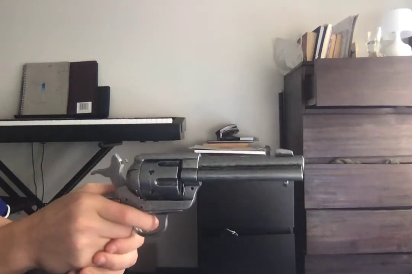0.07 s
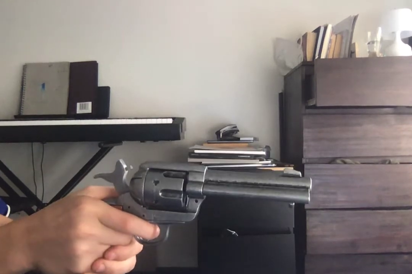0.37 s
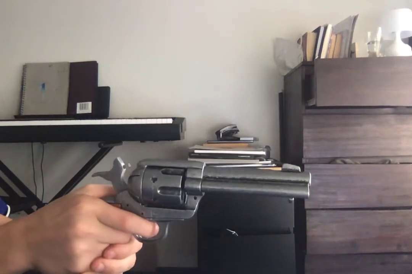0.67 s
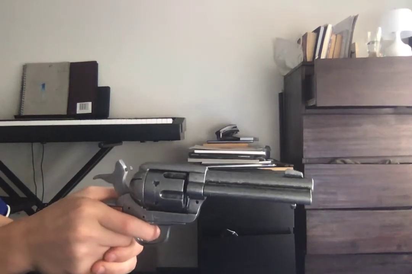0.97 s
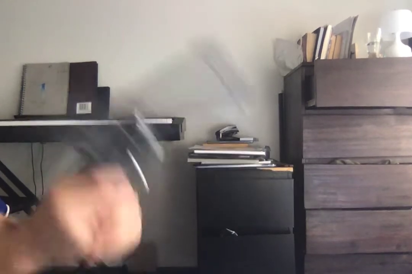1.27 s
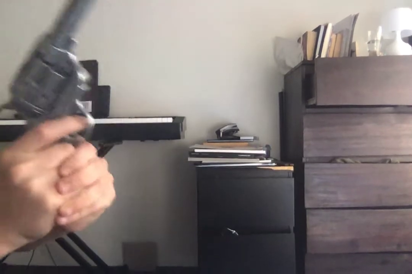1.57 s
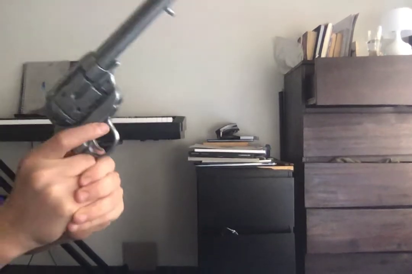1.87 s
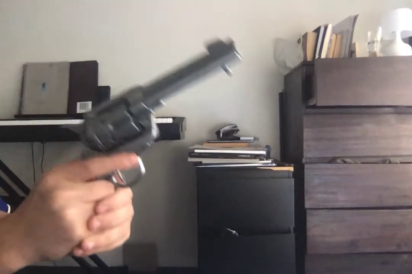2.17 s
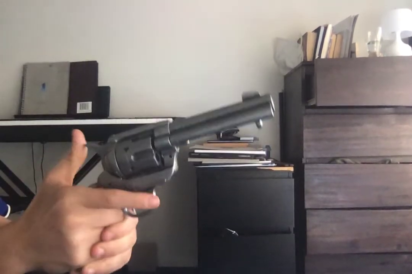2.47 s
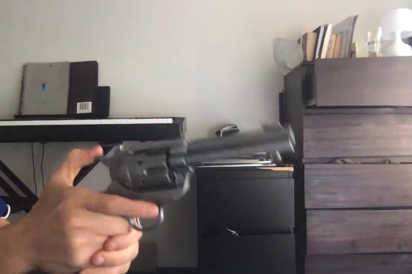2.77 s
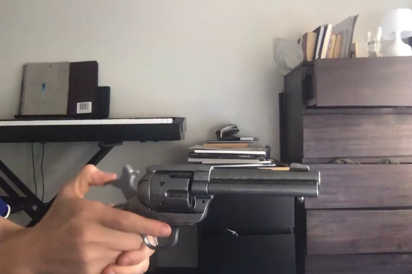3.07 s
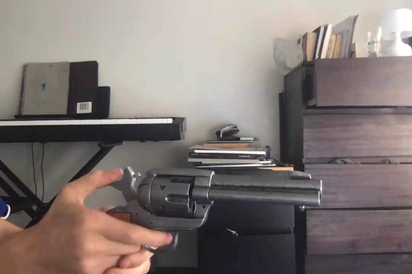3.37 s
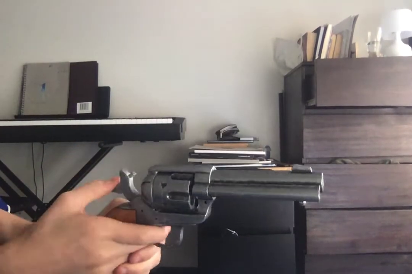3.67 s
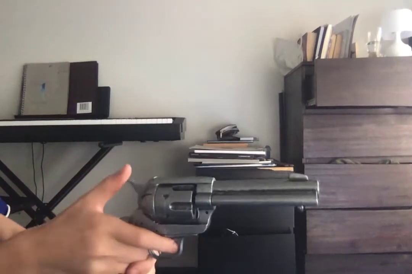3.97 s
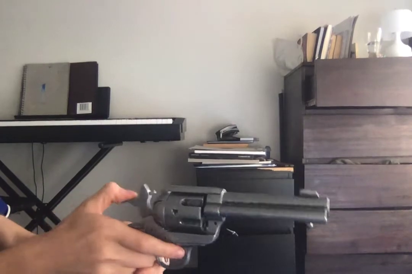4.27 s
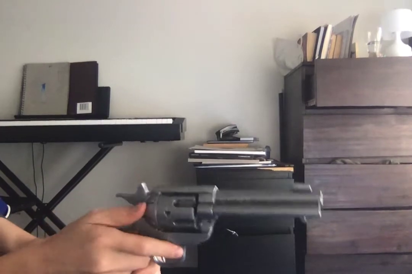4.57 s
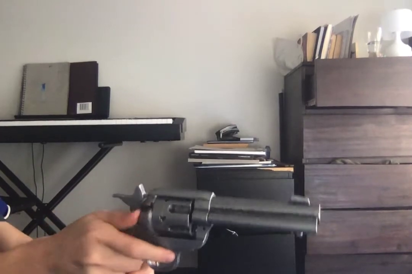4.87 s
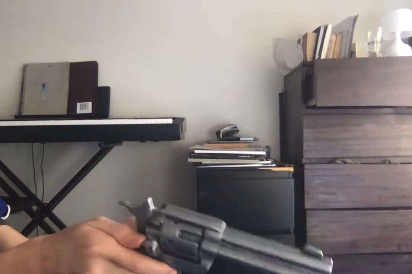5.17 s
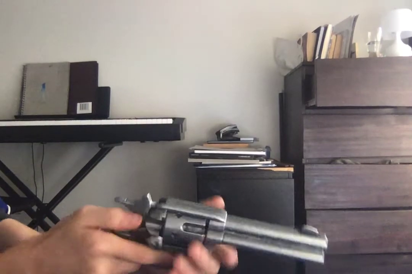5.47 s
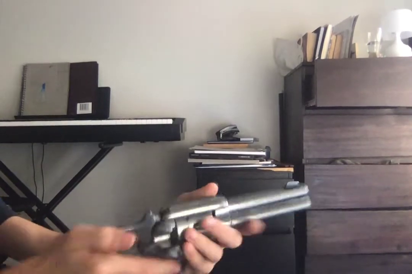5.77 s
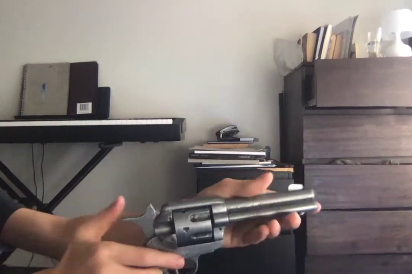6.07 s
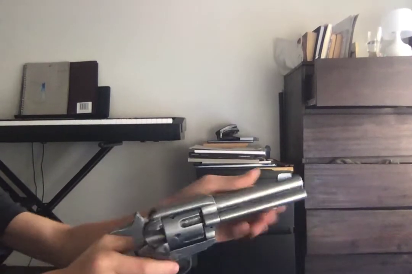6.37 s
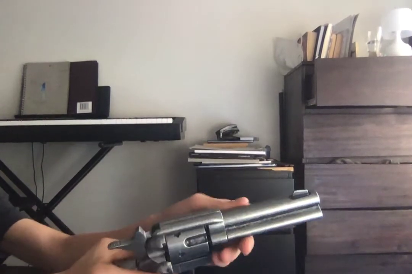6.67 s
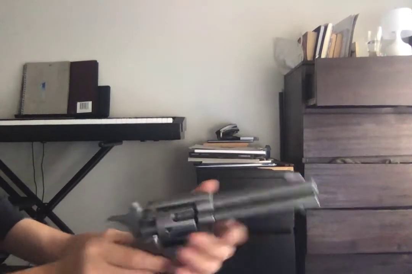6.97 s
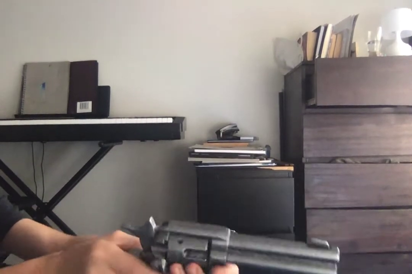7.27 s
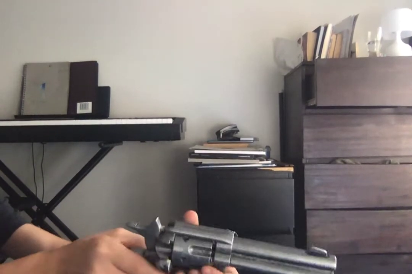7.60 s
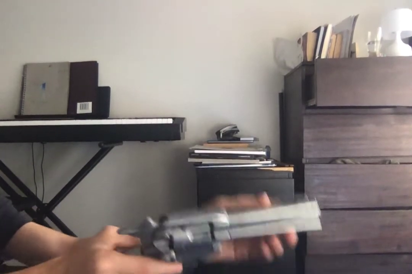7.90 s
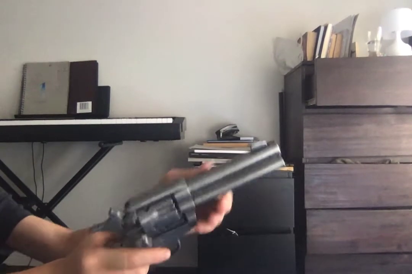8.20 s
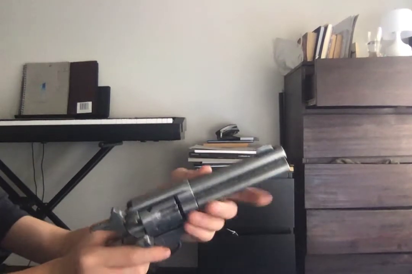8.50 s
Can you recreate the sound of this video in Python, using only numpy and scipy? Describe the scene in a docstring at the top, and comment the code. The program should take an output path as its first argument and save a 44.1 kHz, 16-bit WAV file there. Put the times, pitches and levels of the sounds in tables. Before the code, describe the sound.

In a small room with a quiet rumble, a replica revolver fires a single cap. The sharp crack overloads the close microphone and leaves the furniture briefly ringing. The hammer is then thumbed back with light ratchet clicks and spring pings. A faint whoosh and whine swell and fade far away, while the loose cylinder slides and clinks brightly and handling bumps come through as low thumps.

```python
"""A small room with a quiet rumble, one mono microphone close to a replica revolver.
Just over a second in, the hammer drops and one cap fires: the crack overloads the input for a fifth of
a second and sets the furniture ringing. The hammer is thumbed back in ratchet clicks and spring pings.
A faint whoosh and whine swell far off and fade, while close up the loose cylinder slides and clinks in
the frame and handling bumps reach the microphone as low thumps."""
import sys
import numpy as np
from scipy import signal
from scipy.fft import rfft, irfft, next_fast_len
from scipy.io import wavfile

SR = 44100
rng = np.random.default_rng(int(sys.argv[2]) if len(sys.argv) > 2 else 0)


def generate_wav(signal):
    """Clip the signal to [-1, 1] and save it as 16-bit WAV at the path in sys.argv[1]."""
    frames = np.transpose(np.atleast_2d(signal))
    scaled = np.clip(frames, -1, 1) * 32767
    pcm = np.round(scaled).astype(np.int16)
    wavfile.write(sys.argv[1], SR, pcm)


N = 385434
TIME = np.arange(N) / SR

# Rumble and hiss of the room. Each row: frequency in Hz, relative level in dB per Hz.
ROOM_TONE = [(15, -36), (25, -11.5), (53, 2.5), (76, -7.5), (114, -0.5), (141, -18), (175, -10.5),
             (195, -24.5), (223, -17), (317, -21.5), (659, -26.5), (796, -30.5), (2690, -34.7),
             (14000, -46.8), (16000, -49)]
# Resonances of the distant whoosh. Each row: frequency in Hz, width in Hz, gain in dB.
WHOOSH_PEAKS = [(579, 17, -3.5), (700, 58, 2), (846, 60, -1), (1016, 70, -2.5)]
# Decay of the room. Each row: frequency in Hz, t60 in seconds before linger scales it.
ROOM_T60 = [(100, 0.38), (400, 0.57), (1000, 0.5325), (2000, .5), (4000, 0.4878), (7000, 0.4218),
            (10000, 0.3254), (15000, 0.0038)]
# Colour of the echoes as heard, with the top treble dulled. Each row: frequency in Hz, gain in dB.
ROOM_COLOUR = [(100, -4), (400, -8.5), (1000, 0.5), (2000, 3.5), (4000, -2), (7000, -4.5), (10000, -1),
               (15000, -7)]
# Furniture and fittings rung by the shot. Each row: frequency in Hz, level in dB, t60 in seconds.
FITTING_MODES = [(630, -26, .7), (976, -11, .61), (1056, -12.5, .61), (1396, -10, .55), (2067, -5, .56),
                 (2555, -9, .5)]
# Bumps and puffs of air at the microphone.
# Each row: start in seconds, peak level in dB, resting pitch in Hz, swell time in seconds.
THUMPS = [(1.267, 9, 170, .006), (1.287, 13, 55, .0075), (5.919, -48, 85, .03), (6.595, -41, 380, .004),
          (6.602, -21, 75, .006), (6.628, -25.5, 70, .008), (6.67, -40, 130, .015),
          (6.729, -22.5, 42, .007), (8.33, -21.5, 56, .0086), (8.3597, 6.5, 33, .008),
          (8.421, -39, 70, .052)]
# Metal sliding on metal. Each row: start in seconds, end in seconds, level in dB.
SLIDES = [(1.247, 1.255, -48), (1.255, 1.262, -13.5), (2.738, 2.748, -58), (2.894, 2.902, -47),
          (2.96, 2.966, -39), (3.869, 3.876, -57), (4.27, 4.282, -62), (5.691, 5.728, -70),
          (6.302, 6.317, -54), (6.411, 6.42, -36), (6.666, 6.719, -35.3), (7.316, 7.38, -60),
          (8.03, 8.1, -56), (8.142, 8.216, -45.5), (8.311, 8.35, -40.5), (8.339, 8.363, -30.5)]
# Resonances of the rubbed frame. Each row: frequency in Hz, width in Hz, gain in dB.
FRAME_PEAKS = [(1470, 250, -4), (2170, 220, -1.5), (3100, 91, -3), (4350, 250, -0.5), (6280, 300, -0.5),
               (7110, 250, -5), (7620, 900, -0.5), (9380, 180, -6), (11500, 140, -4.5)]
# Contacts of hammer, pawl and cylinder. Each row: start in seconds, level in dB, brightness in dB,
# pitch of the frame in Hz, contact time in seconds, rebound share from 0 to 1.
CLICKS = [(2.727, -50, -22, 2420, .0016, 0), (2.777, -49.5, -11, 2600, .0012, 0),
          (2.9028, -33, -5, 2450, .0014, 0), (2.9571, -51, 1, 2600, .0018, .8),
          (3.098, -53, -7, 2610, .001, 0), (3.104, -42, 3, 2450, .0007, .85),
          (3.56, -62, -5, 2330, .0008, 0), (3.8217, -39.5, -8, 2050, .0009, 0),
          (3.898, -53.5, 3, 2310, .0006, 0), (4.145, -44, -23, 2400, .0011, 0),
          (4.256, -62, 0, 2630, .0008, 0), (4.2912, -34.5, 1, 2500, .0016, 0),
          (4.393, -40, -9, 2200, .0009, .4), (4.9475, -41.5, -7, 2100, .0009, .8),
          (5.1727, -63, -13, 2200, .001, 0), (5.4065, -63, -28, 2200, .0014, 0),
          (5.6902, -62, -18, 2490, .0008, 0), (5.918, -49, 4, 2500, .0007, 0),
          (6.3307, -52, 4, 2750, .0007, 0), (6.3878, -44.5, 14, 2700, .0021, .3),
          (6.7252, -32, 10.5, 2350, .0015, .5), (7.334, -58, -10, 2050, .001, 0),
          (7.369, -57.5, 2.5, 2270, .0007, 0), (7.4125, -59, -16, 1950, .0012, 0),
          (7.9147, -69, -5, 2200, .0012, 0), (8.0581, -53, 4, 2200, .0021, 0),
          (8.1221, -54, 7, 1950, .0008, 0), (8.138, -49, -3, 2020, .0008, 0),
          (8.213, -55, -1, 1850, .0014, 0), (8.307, -52, 10, 1910, .001, 0),
          (8.361, -30, 14, 2050, .001, .4)]
# Resonances of the struck, hollow frame. Each row: multiple of its pitch, gain in dB.
HOLLOW_PEAKS = [(.45, -15), (.7, -8), (1, 0), (1.45, -11)]
# The grip knocks more once the cocking is over. Each row: time in seconds, dB against the frame.
GRIP_KNOCK = [(4.4, -27), (4.95, -12)]
# Blows that ring the cylinder. Each row: start in seconds, level in dB.
CLINKS = [(5.918, -36), (6.703, -33), (6.7256, -2.5), (8.0594, -41), (8.3612, -3.5), (8.3715, -8)]
# Modes of the cylinder. Each row: frequency in Hz, relative level in dB, t60 in seconds.
CYLINDER_MODES = [(2170, -28, 0.043), (2965, -32.5, .06), (4269, -17, .11), (4958, -19, 0.082),
                  (6200, -23, 0.058), (7090, -16.5, .07), (7620, -5.5, 0.062), (8070, -6.5, 0.062),
                  (8283, -2.5, .035), (8680, -9, .035), (9380, -17.5, 0.055), (10930, -12, .09),
                  (11070, -13.5, .06), (11420, -4.5, .09), (12600, -25, .08), (14450, -13, .045),
                  (15250, -14, .07)]
# Short high metal pings. Each row: start in seconds, level in dB, pitch in Hz, t60 in seconds.
PINGS = [(2.9035, -15.5, 3800, .012), (2.9565, -26, 7360, .26), (3.105, -26, 3850, .016),
         (4.2925, -26.5, 7440, .14), (5.918, -33, 4290, .06), (5.918, -32, 6175, .05),
         (6.389, -25, 6260, .05), (7.369, -42, 4800, .025)]
# Modes of a ping. Each row: multiple of its pitch, relative level in dB.
PING_MODES = [(0.998, -6), (1.01, -2), (1.485, -18)]
# The hammer lands on the cap. One row: start in seconds, level in dB, contact time in seconds.
HAMMER_FALL = (1.2553, 0, 0.0013)
# The charge goes off. One row: start in seconds, base level in dB, burn time in seconds.
CHARGE = (1.2642, 18.56, 0.0065)
# Spectrum of the crack. Each row: frequency in Hz, relative level in dB per Hz.
SHOT_COLOUR = [(30, -14.5), (100, -8), (250, -6), (500, -9.5), (1000, -2.5), (2000, 0.5), (4000, 2),
               (7000, 2.5), (10000, -2.5), (15000, -5)]


def from_db(db):
    """Decibels to gain."""
    return 10 ** (np.asarray(db) / 20)


def rms_one(x):
    """Scale to an rms of 1."""
    return x / np.sqrt(np.mean(x ** 2) + 1e-20)


def at_hz(points, hz):
    """Read a table on a log-frequency axis."""
    known_hz, values = np.transpose(points)
    return np.interp(np.log(np.maximum(hz, 1)), np.log(known_hz), values)


def add(track, s, sound):
    """Mix a sound into a track at s seconds."""
    i = max(round(s * SR), 0)
    track[i:i + len(sound)] += sound[:N - i]


def band(x, low_hz, high_hz, order=2):
    """Butterworth band-pass."""
    sections = signal.butter(order, [low_hz, min(high_hz, .48 * SR)], "band", fs=SR, output="sos")
    return signal.sosfilt(sections, x + 1e-18)


def resonate(x, peaks):
    """Parallel resonances of alternating sign."""
    return sum((-1) ** k * from_db(db) * signal.lfilter(*signal.iirpeak(hz, hz / width, fs=SR), x)
               for k, (hz, width, db) in enumerate(peaks))


def noise(colour, size):
    """Noise of a given spectrum, rms 1."""
    n = next_fast_len(size)
    gain = from_db(at_hz(colour, np.arange(n // 2 + 1) * SR / n))
    return rms_one(irfft(rfft(rng.standard_normal(n)) * gain, n)[:size])


def swell(t, peak_s):
    """Rises to 1 at peak_s, then dies away."""
    return t / peak_s * np.exp(1 - t / peak_s)


def ring(hz, db, t60):
    """One struck mode."""
    t = TIME[:SR]
    return from_db(db - 60 * t / t60) * np.sin(2 * np.pi * hz * t)


def room_tone(level_db=-56.5):
    """The steady rumble and hiss of the room."""
    return from_db(level_db) * noise(ROOM_TONE, N)


def distant_whoosh(start_s=4.3, attack_s=.2, level_db=-58.3, fade_db_per_s=7.7, whine_db=-9,
                   start_hz=450, end_hz=945, climb_s=1.02, flare_hz=733, width_hz=32, flare_db=16.5):
    """Far off, a hollow whoosh swells and fades; its whine climbs and flares up through a resonance."""
    age = np.maximum(TIME - start_s, 0)
    attack = np.minimum(age / attack_s, 1) ** 2
    fade = from_db(level_db - fade_db_per_s * np.maximum(age - attack_s, 0))
    whoosh = rms_one(band(resonate(rng.standard_normal(N), WHOOSH_PEAKS), 480, 1800))
    hz = end_hz + (start_hz - end_hz) * np.exp(-age / climb_s)
    waver = rms_one(band(rng.standard_normal(N), .7, 18))
    whine = rms_one(waver * np.sin(2 * np.pi * np.cumsum(hz) / SR))
    flare = 1 + from_db(flare_db) / (1 + (2 * (hz - flare_hz) / width_hz) ** 2)
    return attack * fade * (whoosh + from_db(whine_db) * flare * whine)


def room_echoes(x, linger, first_echo_s=.0027, build_s=.003):
    """Diffuse echoes follow a short gap and die faster in the treble; linger scales their decay time."""
    t, echoes = TIME[:SR], np.zeros(SR)
    late = np.maximum(t - first_echo_s, 0)
    white = rng.standard_normal((2, SR))
    edges_hz = np.geomspace(40, 19000, 19)
    for k, (low, high) in enumerate(zip(edges_hz, edges_hz[1:])):
        hz = np.sqrt(low * high)
        t60 = linger * at_hz(ROOM_T60, hz)
        unit_energy = np.sqrt(2 * np.log(1000) / (t60 * SR))
        decay = from_db(at_hz(ROOM_COLOUR, hz) - 60 * late / t60)
        echoes += band(white[k % 2], low, high) * unit_energy * decay
    return signal.fftconvolve(x, echoes * (1 - np.exp(-late / build_s)))[:N]


def microphone_thumps(shudder_hz=296, sink_s=.004, doubling_db=15):
    """A bump at the microphone starts as a shudder, quicker if harder, and slows to a deep wobble."""
    out, t = np.zeros(N), TIME[:SR // 2]
    for s, db, rest_hz, swell_s in THUMPS:
        hz = rest_hz + shudder_hz * 2 ** (db / doubling_db) * np.exp(-t / sink_s)
        add(out, s, from_db(db) * swell(t, swell_s) * np.sin(2 * np.pi * np.cumsum(hz) / SR))
    return out


def metal_slides(slips_per_s=750, spread_db=4.5, rasp_db=-12):
    """Small uneven slips rasp and ring the frame, each with its own mix of resonances."""
    out = np.zeros(N)
    for start, end, db in SLIDES:
        n = max(round((end - start) * SR), SR // 200)
        pressure = np.pad(signal.windows.tukey(n, .5), (0, SR // 100))
        slips = (rng.random(len(pressure)) < slips_per_s / SR) * pressure
        slips[n // 2] = 1   # every slide catches at least once
        slips *= from_db(spread_db * rng.standard_normal(len(slips)))
        metal = sum(resonate(slips * rng.standard_normal(len(slips)), [peak]) for peak in FRAME_PEAKS)
        rasp = band(rng.standard_normal(len(slips)) * pressure, 1900, 10000)
        sound = band(rms_one(metal) + from_db(rasp_db) * rms_one(rasp), 1100, 17000)
        top_hz = np.clip(9000 * from_db(db + 42.5), 4000, 16000)   # a light touch is duller
        sound = band(sound, 500, top_hz, order=1)
        add(out, start, from_db(db) * rms_one(sound) * np.sqrt(len(sound) / n))
    return out


def ratchet_clicks(grip_hz=580, grip_width_hz=270, firm_db=-44, middle_db=2, rebound_s=.01):
    """Metal contacts chatter: a knock in the grip, the hollow frame, a hard middle, a bright edge."""
    out, t = np.zeros(N), TIME[:SR // 25]
    for s, db, bright_db, frame_hz, contact_s, rebound in CLICKS:
        width_hz = 500 * from_db(.2 * bright_db)   # a brighter, harder contact damps the frame
        peaks = [(frame_hz * multiple, width_hz, peak_db) for multiple, peak_db in HOLLOW_PEAKS]
        knock_db = np.interp(s, *np.transpose(GRIP_KNOCK)) + .4 * (db - firm_db)   # firmer knocks more
        for delay_s, share in ((0, 1), (rebound_s, rebound)):   # some parts bounce once
            force = rng.standard_normal((4, len(t))) * swell(t, contact_s)
            grip = rms_one(band(resonate(force[0], [(grip_hz, grip_width_hz, 0)]), 350, 1700))
            frame = rms_one(band(resonate(force[1], peaks), 900, 4200))
            middle = from_db(middle_db + .55 * bright_db) * rms_one(band(force[2], 3250, 6400, order=3))
            edge = from_db(bright_db) * rms_one(band(force[3], 6340, 12300))
            click = from_db(knock_db) * grip + frame + middle + edge
            add(out, s + delay_s, share * from_db(db) * click)
    return out


def cylinder_clinks(scatter_db=2):
    """The loose cylinder rings; every blow gives each mode a strength of its own."""
    out = np.zeros(N)
    for s, db in CLINKS:
        for hz, mode_db, t60 in CYLINDER_MODES:
            add(out, s, rng.choice([-1, 1]) * ring(hz, db + mode_db + rng.normal(0, scatter_db), t60))
    return out


def metal_pings():
    """A spring, a pawl or the softly knocked cylinder rings on a few high notes."""
    out = np.zeros(N)
    for s, db, hz, t60 in PINGS:
        add(out, s, sum(ring(hz * multiple, db + mode_db, t60) for multiple, mode_db in PING_MODES))
    return out


def cap_shot(direct_db=-2, puff_db=-4, puff_s=.009, echo_db=5, pulse_samples=512):
    """The hammer snaps, the charge cracks and fills the room, and its puff shakes the close microphone."""
    direct, to_walls, t = np.zeros(N), np.zeros(N), TIME[:SR // 3]
    hammer_s, hammer_db, contact_s = HAMMER_FALL
    snap = rms_one(band(rng.standard_normal(len(t)), 2500, 8000, order=1)) * swell(t, contact_s)
    add(direct, hammer_s, from_db(hammer_db) * snap)
    s, db, burn_s = CHARGE
    crack = from_db(db) * noise(SHOT_COLOUR, len(t)) * swell(t, burn_s)
    add(direct, s, from_db(direct_db) * crack)
    puff = rms_one(band(rng.standard_normal(len(t)), 19, 420, order=1)) * swell(t, puff_s)
    add(direct, s + burn_s, from_db(db + puff_db) * puff)   # the puff trails the crack
    add(direct, s + burn_s, sum(ring(*mode) for mode in FITTING_MODES))
    # the walls return the energy of the crack as echoes of one sharp pulse
    spectrum = from_db(at_hz(SHOT_COLOUR, np.fft.rfftfreq(pulse_samples, 1 / SR)))
    pulse = np.fft.fftshift(irfft(spectrum))
    add(to_walls, s - pulse_samples / 2 / SR, pulse * np.linalg.norm(crack) / np.linalg.norm(pulse))
    return direct + from_db(echo_db) * room_echoes(to_walls, linger=.94)


def scene(click_room_db=-2.5, clink_room_db=-1, slide_room_db=-2):
    """The gun close up and the room behind it, at one microphone that feeds both channels."""
    clicks = ratchet_clicks()
    ringing = cylinder_clinks() + metal_pings()
    slides = metal_slides()
    to_walls = (from_db(click_room_db) * clicks + from_db(clink_room_db) * ringing
                + from_db(slide_room_db) * slides)
    mechanism = clicks + ringing + slides + room_echoes(to_walls, linger=.82)
    mono = cap_shot() + mechanism + microphone_thumps() + distant_whoosh() + room_tone()
    return np.stack([mono, mono])


def record(dry, ceiling=.71, cutoff_hz=15850):
    """This close to the gun the input clips hard; the top of the treble is cut."""
    oversampled = signal.resample_poly(dry, 2, 1, axis=1)
    clipped = signal.resample_poly(np.clip(oversampled, -ceiling, ceiling), 1, 2, axis=1)
    low_pass = signal.firwin(255, cutoff_hz, fs=SR)
    return signal.fftconvolve(clipped, low_pass[None], "same", axes=1)


dry = scene()
out = record(dry)
generate_wav(out)
```